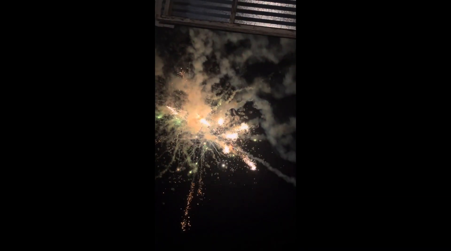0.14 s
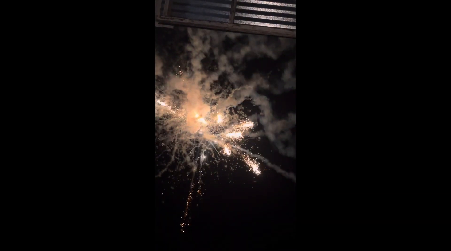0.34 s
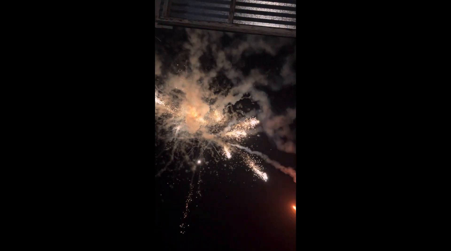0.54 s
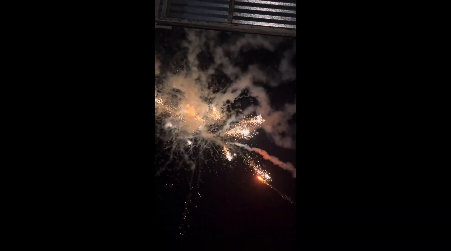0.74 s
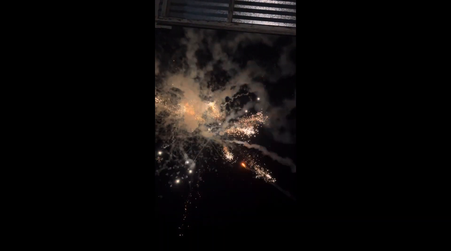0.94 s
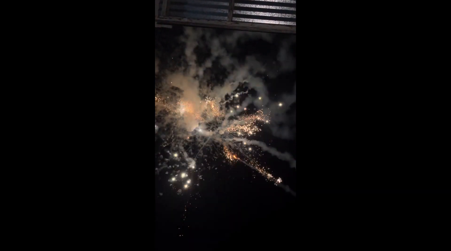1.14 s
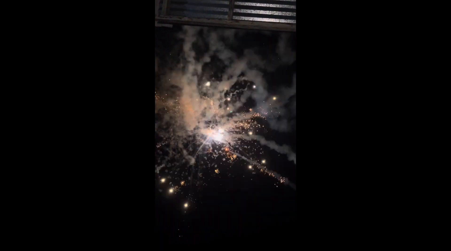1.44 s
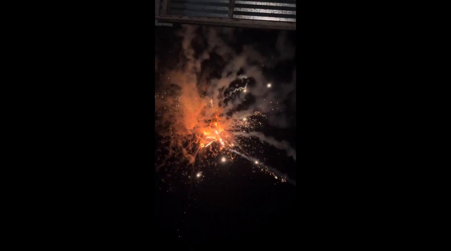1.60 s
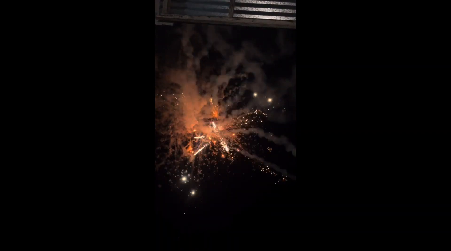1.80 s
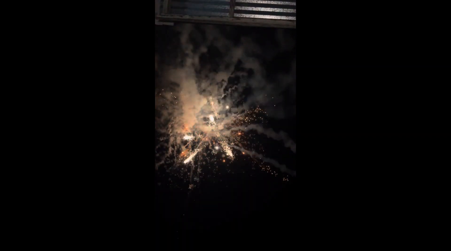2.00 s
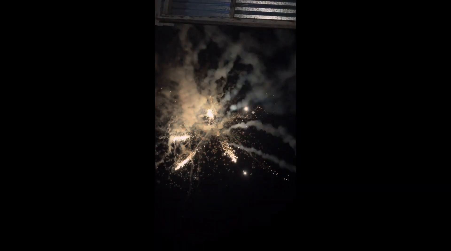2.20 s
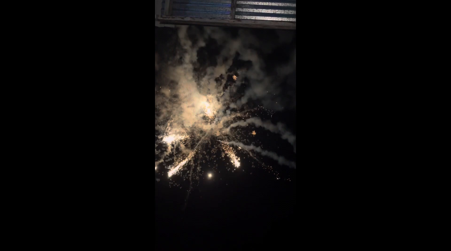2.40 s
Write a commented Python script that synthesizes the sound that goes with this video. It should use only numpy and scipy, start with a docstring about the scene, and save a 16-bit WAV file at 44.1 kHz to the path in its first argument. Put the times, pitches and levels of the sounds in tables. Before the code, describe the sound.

Two firework shells explode with hard cracks and deep thumps, their echoes fading over low rumble while stars pop and crackle throughout; outdoors, stereo microphone under a roof, its limiter squashing the bangs.

```python
"""Fireworks cake under a metal roof.

Two shells bang as pressure jumps with sharp cracks; noise bands form their echo tails, sines the roof hum.
Burning stars overhead crackle as coloured clicks, dense or as loud single pops, over a noise hiss.
Far echoes of earlier shells rumble as low noise. A two-port microphone gives the stereo image;
it delays the bass, and its limiter holds the bangs down."""
import sys
import numpy as np
from scipy import signal
from scipy.fft import rfft, irfft
from scipy.io import wavfile
from scipy.ndimage import uniform_filter1d, minimum_filter1d

SR = 44100
rng = np.random.default_rng(int(sys.argv[2]) if len(sys.argv) > 2 else 0)


def pcm_store(signal):
    """Save signal as 16-bit PCM."""
    levels = np.round(np.clip(np.atleast_2d(signal), -1, 1) * 32767)
    wavfile.write(sys.argv[1], SR, levels.astype(np.int16).T)


N = 112454
T = np.arange(N) / SR
SIZE = 2 ** 17  # FFT length
HZ = np.maximum(np.arange(SIZE // 2 + 1) * SR / SIZE, 1)


def from_db(db):
    """Amplitude factor of a level in dB."""
    return 10 ** (np.asarray(db) / 20)


def at_hz(points, hz):
    """Table value at hz, interpolated over log frequency."""
    table_hz, values = np.transpose(points)
    return np.interp(np.log(hz), np.log(table_hz), values)


def in_time(rows):
    """Each column of a time table, interpolated to every sample."""
    start_s, *columns = np.transpose(rows)
    return [np.interp(T, start_s, column) for column in columns]


def rms_one(x):
    """Scale to an RMS of one."""
    return x / np.sqrt(np.mean(x ** 2) + 1e-20)


def wander(window):
    """Slow random curve of RMS one: noise averaged twice over a window in samples."""
    once = uniform_filter1d(rng.standard_normal(N), size=window)
    return rms_one(uniform_filter1d(once, size=window))


def through(x, response):
    """Filter by a frequency response."""
    return irfft(rfft(x, SIZE) * response, SIZE)[..., :N]


def causal(points):
    """Minimum-phase response with the given colour, by folding its cepstrum."""
    cepstrum = irfft(np.log(from_db(at_hz(points, HZ))), SIZE)
    cepstrum[1:SIZE // 2] *= 2
    cepstrum[SIZE // 2 + 1:] = 0
    return np.exp(rfft(cepstrum))


def after(start_s, swell_s, t60_s):
    """Envelope that swells from start_s and decays exponentially."""
    t = np.maximum(T - start_s, 0)
    return (1 - np.exp(-t / swell_s)) * from_db(-60 * t / t60_s)


# Phase between the microphone ports. Each row: frequency in Hz, lead of left over right in radians.
PORT_LEAD = [(100, 0), (500, -.3), (1400, -.3), (2000, .7), (2800, 1.5), (5000, 2), (6000, 3.1), (7600, 6),
             (9000, 7.4), (10200, 9.4), (12500, 12.3), (14600, 15.7)]
# Level between the ports. Each row: frequency in Hz, left minus right in dB.
PORT_LEVEL = [(500, -.3), (1200, 2.2), (2000, 0), (2800, -2), (6000, -.3)]


def ports(lead_ms, lead_rad=0):
    """Left and right port responses; the arguments add to the left lead."""
    lead = at_hz(PORT_LEAD, HZ) + lead_rad + 2 * np.pi * HZ * lead_ms / 1000
    phase = np.exp(.5j * np.outer([1, -1], lead))
    return phase * from_db(np.outer([.5, -.5], at_hz(PORT_LEVEL, HZ)))


# Far echoes. Each row: time in seconds, level in dB before the wander.
RUMBLE_LEVEL = [(0, -45), (.2, -45), (.9, -54), (1.5, -51.5), (2.0, -51), (2.55, -55)]
# Far echo spectrum. Each row: frequency in Hz, relative level in dB per Hz.
RUMBLE_SPECTRUM = [(30, -53), (60, -0.5), (90, 4.5), (150, -2), (300, 0), (600, -11.5), (2000, -76)]
RUMBLE_WANDER_DB = 5.0


def rumble():
    """Far echoes of earlier shells merge into low noise of wandering level."""
    noise = rms_one(through(rng.standard_normal(N), causal(RUMBLE_SPECTRUM)))
    return from_db(in_time(RUMBLE_LEVEL)[0] + RUMBLE_WANDER_DB * wander(window=4000)) * noise


# Hum onsets. Each row: start in seconds, level in dB.
HUM_STARTS = [(0.241, -16), (1.645, -17.5)]
# Roof modes. Each row: frequency in Hz, level in dB relative to the hum, T60 in seconds.
ROOF_MODES = [(43.85, -4.5, 0.81), (48.8, -0.5, 0.79), (49.5, -6, 0.23)]
HUM_SWELL_S = 0.0067


def roof():
    """Close low modes of the roof, set humming by each shell, beat against each other."""
    hum = np.zeros(N)
    for start_s, hum_db in HUM_STARTS:
        for hz, mode_db, t60_s in ROOF_MODES:
            sine = np.sin(2 * np.pi * hz * (T - start_s))
            hum += from_db(hum_db + mode_db) * after(start_s, HUM_SWELL_S, t60_s) * sine
    return hum


# Shell echoes. Each row: start in seconds, level in dB, tilt in dB per octave above the lowest band,
# T60 factor.
ECHO_TAILS = [(0.215, -21.5, 1, 0.74), (1.616, -24, 0.2, 0.79)]
# Tail spectrum. Each row: frequency in Hz, noise band gain in dB.
TAIL_GAIN = [(60, 11), (140, 15), (250, 19), (400, 17), (700, 9.5), (1500, 1), (4000, -2.5), (12000, -32)]
# Tail decay. Each row: frequency in Hz, T60 in seconds before the tail's factor.
TAIL_DECAY = [(60, 1), (150, 0.98), (400, 0.48), (1500, 0.23), (8000, 0.52)]
TAIL_SWELL_S = 0.0073
TAIL_FULL_WIDTH_HZ = 1500


def tails():
    """Neighbourhood echoes: half-octave noise bands, each with its own decay, wider with frequency."""
    out = np.zeros((2, N))
    edges_hz = 60 * 2 ** np.arange(0, 8.1, .5)
    white = rng.standard_normal((2, 2, N))  # neighbouring bands take different noise
    for k, (low_hz, high_hz) in enumerate(zip(edges_hz, edges_hz[1:])):
        band = signal.butter(2, [low_hz, high_hz], "band", fs=SR, output="sos")
        mid, side = signal.sosfilt(band, white[k % 2])
        hz = np.sqrt(low_hz * high_hz)
        shape = np.zeros(N)
        for start_s, db, tilt_db, t60_factor in ECHO_TAILS:
            t60_s = t60_factor * at_hz(TAIL_DECAY, hz)
            shape += from_db(db + tilt_db * k / 2) * after(start_s, TAIL_SWELL_S, t60_s)
        width = min(hz / TAIL_FULL_WIDTH_HZ, 1)
        out += from_db(at_hz(TAIL_GAIN, hz)) * shape * (mid + width * side * [[1], [-1]])
    return out


# Burning stars and far crackle. Each row: time in seconds, level in dB before flicker and swell.
HISS_LEVEL = [(0.0, -37), (0.41, -36.5), (0.8, -37), (1.02, -35.5), (1.21, -31.5), (1.38, -31),
              (1.57, -34.5), (1.9, -36.5), (2.15, -40.5), (2.55, -38.5)]
# Hiss spectrum. Each row: frequency in Hz, relative level in dB per Hz.
HISS_SPECTRUM = [(40, -20), (90, -15), (250, -11.5), (600, -7), (1500, -9), (3000, -5.5), (5000, -5),
                 (8000, -17), (13000, -21), (16000, -46)]
# Likeness of the hiss at the two ports. Each row: frequency in Hz, shared share of power, clipped to 0-1.
HISS_SHARED = [(200, 1), (1000, 0.58), (3000, 0), (6000, 1), (12000, 1)]
HISS_FLICKER_DB = 1.5
HISS_FOLLOW_POWER, SCATTER_S = 0.12, 0.004


def hiss(relative_clicks):
    """Flickering noise, partly shared by the ports, swells with the scattered echoes of each pop."""
    shared, *own = rng.standard_normal((3, N))
    alike = np.clip(at_hz(HISS_SHARED, HZ), 0, 1)
    noise = through(shared, np.sqrt(alike) * ports(0)) + through(np.array(own), np.sqrt(1 - alike))
    noise = rms_one(through(noise, causal(HISS_SPECTRUM)))
    r = np.exp(-1 / (SCATTER_S * SR))
    busy = signal.lfilter([1 - r], [1, -r], relative_clicks ** 2)
    swell = rms_one((busy + 0.5) ** HISS_FOLLOW_POWER)
    return swell * from_db(in_time(HISS_LEVEL)[0] + HISS_FLICKER_DB * wander(window=600)) * noise


# Loudest star pops. Each row: time in seconds, click level in dB before POP_GAIN_DB.
LOUD_POPS = [(0.0382, -36), (0.0578, -33), (0.0852, -27), (0.109, -23.0), (0.1153, -25), (0.1292, -22),
             (0.142, -16.5), (0.1921, -14.5), (0.3274, -30), (0.357, -24), (0.3696, -21), (0.374, -23),
             (0.3848, -24), (0.427, -27), (0.435, -20), (0.4745, -20), (0.5262, -18), (0.53, -21.5),
             (0.5355, -21.0), (0.5411, -16), (0.5538, -28), (0.5758, -20), (0.5881, -18.5), (0.6025, -29),
             (0.6312, -24), (0.6482, -28), (0.656, -23.0), (0.6624, -21), (0.6687, -24), (0.6786, -21),
             (0.6849, -21.0), (0.691, -21), (0.6981, -27), (0.711, -21.5), (0.7169, -23), (0.7332, -22.0),
             (0.736, -24.5), (0.7408, -23), (0.7531, -20), (0.8117, -22), (0.8188, -15), (0.8446, -21.5),
             (0.8637, -22), (0.9154, -16), (0.9384, -23), (0.95, -19), (0.959, -30), (0.9856, -21.5),
             (0.9912, -16.5), (0.9955, -17.5), (1.002, -19.5), (1.0371, -16), (1.0597, -19.5),
             (1.0643, -19), (1.0695, -18.5), (1.1005, -29), (1.1223, -17.5), (1.1435, -16), (1.176, -15),
             (1.1867, -17), (1.2021, -17), (1.217, -23), (1.2479, -14.5), (1.2597, -16.0), (1.264, -24.5),
             (1.2794, -13), (1.2879, -23), (1.3325, -17.5), (1.337, -19.0), (1.3456, -22), (1.3741, -22),
             (1.382, -18.0), (1.3884, -12), (1.4342, -18), (1.442, -22), (1.4616, -20), (1.4714, -22),
             (1.4855, -24), (1.4972, -20), (1.4997, -22), (1.5037, -20.0), (1.5066, -16), (1.5244, -27),
             (1.549, -20.0), (1.5569, -14), (1.67, -25), (1.6847, -23), (1.7085, -31), (1.718, -25),
             (1.7215, -24.5), (1.7331, -17), (1.7654, -22), (1.7729, -15), (1.7806, -19), (1.797, -19.0),
             (1.8023, -16), (1.8077, -19), (1.812, -24), (1.841, -16.5), (1.8487, -16), (1.8567, -14),
             (1.8602, -21), (1.8657, -18.0), (1.8805, -23), (1.8856, -13), (1.8926, -16), (1.9025, -20),
             (1.9278, -20), (1.9339, -19), (1.9452, -18), (1.9553, -21), (1.9596, -17.5), (1.9636, -19.5),
             (1.9825, -21), (1.9871, -20), (2.0016, -15.0), (2.0072, -16.5), (2.012, -30), (2.018, -15),
             (2.028, -19.5), (2.0364, -19.0), (2.0558, -22), (2.0659, -36), (2.0773, -17), (2.0879, -17),
             (2.1064, -17), (2.1139, -19.0), (2.1677, -20.5), (2.186, -23), (2.1903, -20), (2.2014, -17),
             (2.2066, -19.5), (2.2134, -20.0), (2.23, -17.0), (2.2433, -20.0), (2.2827, -19), (2.2944, -27),
             (2.3056, -14), (2.3156, -17.5), (2.3222, -18), (2.364, -12.5), (2.376, -19.0), (2.381, -15.5),
             (2.3834, -23), (2.4309, -24.5), (2.4619, -20.5), (2.4659, -20), (2.5092, -19.5),
             (2.5121, -18.0), (2.5443, -18.5)]
# Crackle of other stars. Each row: time in seconds, RMS click level in dB, pops per second before clumping.
CRACKLE_RATE = [(0.0, -32.5, 730), (0.4, -31, 630), (0.82, -36, 350), (0.99, -40.5, 630), (1.15, -28, 440),
                (1.37, -27, 500), (1.8, -31, 460), (2.28, -47, 310), (2.55, -41, 560)]
POP_GAIN_DB = 17
POP_SPREAD_DB, CLUMP_DB = 4.5, 4


def star_clicks():
    """Clumped random clicks plus the loud pops; also returns them relative to the crackle level."""
    level_db, pops_per_s = in_time(CRACKLE_RATE)
    sizes = from_db(POP_SPREAD_DB * np.minimum(rng.exponential(1, N), 3))
    chance = pops_per_s * from_db(CLUMP_DB * wander(window=500)) / SR
    clicks = from_db(level_db) * rms_one(sizes * (rng.random(N) < chance))
    pop_s, pop_db = np.transpose(LOUD_POPS)
    clicks[(pop_s * SR).astype(int)] = from_db(pop_db + POP_GAIN_DB)
    return clicks, clicks / from_db(level_db)


# Pop spectrum. Each row: frequency in Hz, gain in dB.
POP_SPECTRUM = [(60, -24.5), (220, -5.5), (500, 0), (1400, 2), (2200, 1), (3500, -5.5), (5000, -5),
                (8000, -10.5), (13000, -22), (16000, -27)]
# Near echoes off roof, ground and wall. Each row: delay in seconds, level in dB.
NEAR_ECHOES = [(.0021, -27.5), (0.0099, -13), (.037, -10)]
PATCH_STEP_MS = 0.0092  # port lead from one patch of sky to the next


def pops(clicks):
    """Coloured clicks from five patches of sky, each with near echoes."""
    patch = rng.integers(-2, 3, N)
    echoes = sum(from_db(db) * np.exp(-2j * np.pi * HZ * delay_s) for delay_s, db in NEAR_ECHOES)
    colour = causal(POP_SPECTRUM) * (1 + echoes)
    return sum(through(clicks * (patch == k), colour * ports(k * PATCH_STEP_MS)) for k in range(-2, 3))


def stars():
    """Burning stars: the same clicks sound as pops and drive the swell of the hiss."""
    clicks, relative_clicks = star_clicks()
    return hiss(relative_clicks) + pops(clicks)


# Blast fronts, with the thud before and slap-backs after. Each row: start in seconds, jump level in dB,
# rise in ms, sag corner in Hz, crack level in dB.
BLAST_FRONTS = [(0.2085, -2, 0.32, 89, -51), (.2150, 5.5, 0.057, 92, 6), (0.2221, 6.5, 0.54, 44.5, -5),
                (1.5896, 8, 0.064, 50, 5), (1.6005, -2.5, 0.21, 60, -21), (1.6275, -0.5, 0.39, 200, -30)]
# Crack spectrum. Each row: frequency in Hz, gain in dB.
CRACK_SPECTRUM = [(300, 14), (1500, -19.5), (4000, 10.5), (8000, -1), (13000, -5), (16500, -12)]


def blasts():
    """Each front is a sharp crack on a pressure jump that sags back exponentially."""
    jumps, cracks = np.zeros(N), np.zeros(N)
    for start_s, jump_db, rise_ms, sag_hz, crack_db in BLAST_FRONTS:
        sag_t60_s = np.log(1000) / (2 * np.pi * sag_hz)
        jumps += from_db(jump_db) * after(start_s, rise_ms / 1000, sag_t60_s)
        cracks[int(start_s * SR)] = from_db(crack_db)
    return jumps + through(cracks, causal(CRACK_SPECTRUM))


# Bass of the shells and roof reaches the right port earlier. Each row: frequency in Hz,
# added left lead in radians.
BASS_LEAD = [(60, -.32), (200, -.55), (500, -.95), (1000, -.7), (1500, -.4), (2000, 0)]


def scene():
    """Sum of all sources at the two ports."""
    shells_and_roof = through(blasts() + roof(), ports(0, at_hz(BASS_LEAD, HZ)))
    return rumble() + tails() + stars() + shells_and_roof


BASS_DELAY_LOW_HZ, BASS_DELAY_HIGH_HZ = 50.7, 890  # outer all-pass corners
LOW_CUT_HZ, STOPBAND_HZ = 40, 16600
LIMIT_DB, RELEASE_DB_PER_S, ATTACK_S = -1, 400, .0003


def record(dry):
    """All-pass stages delay the bass, lows are cut, a limiter holds the peaks, the top is cut."""
    corners_hz = np.geomspace(BASS_DELAY_LOW_HZ, BASS_DELAY_HIGH_HZ, num=9)
    delay = np.prod([(1j * HZ - hz) / (1j * HZ + hz) for hz in corners_hz], axis=0)
    low_cut = -HZ ** 2 / (LOW_CUT_HZ ** 2 - HZ ** 2 + np.sqrt(2) * 1j * HZ * LOW_CUT_HZ)
    x = through(dry, delay * low_cut)
    over_db = np.maximum(20 * np.log10(np.abs(x).max(axis=0) + 1e-9) - LIMIT_DB, 0)
    over_db = -minimum_filter1d(-over_db, size=89)  # maximum within 1 ms either side
    release_db = RELEASE_DB_PER_S * T
    held_db = np.maximum.accumulate(over_db + release_db) - release_db
    r = np.exp(-1 / (ATTACK_S * SR))
    x = x * from_db(-signal.lfilter([1 - r], [1, -r], held_db))
    return signal.sosfilt(signal.cheby2(12, 70, STOPBAND_HZ, fs=SR, output="sos"), x)


dry = scene()
out = record(dry)
pcm_store(out)
```